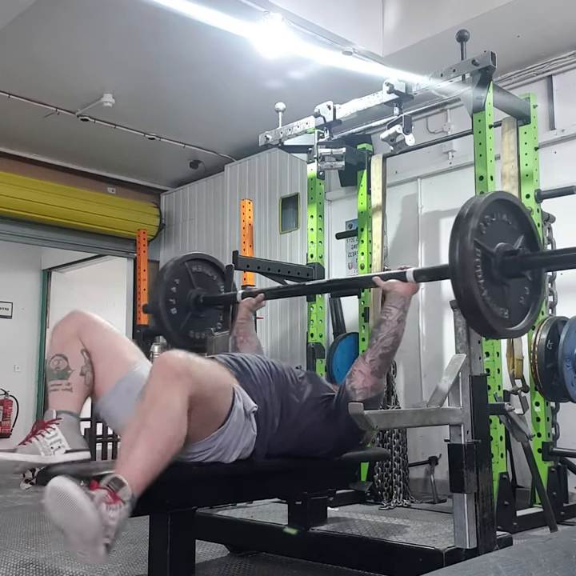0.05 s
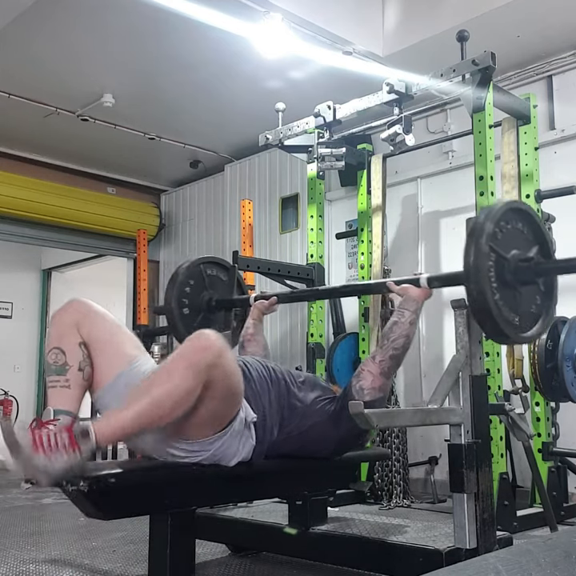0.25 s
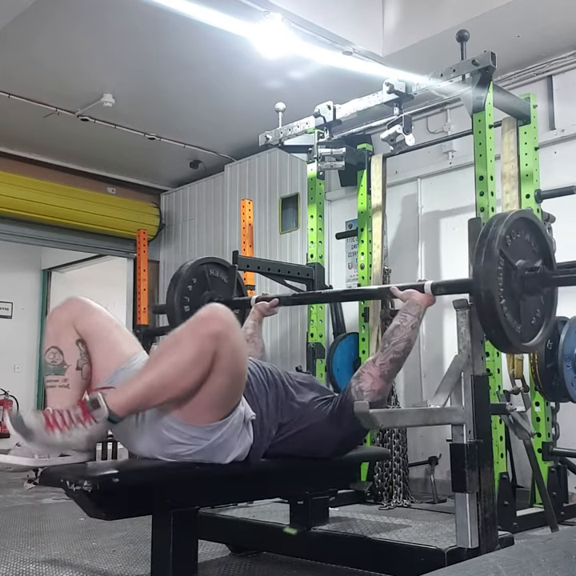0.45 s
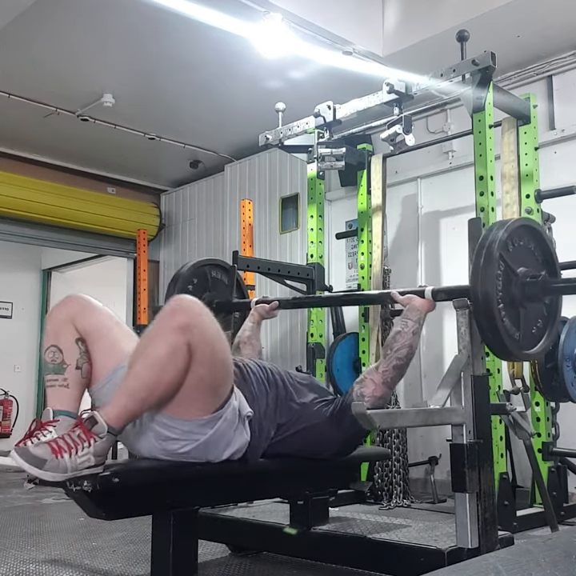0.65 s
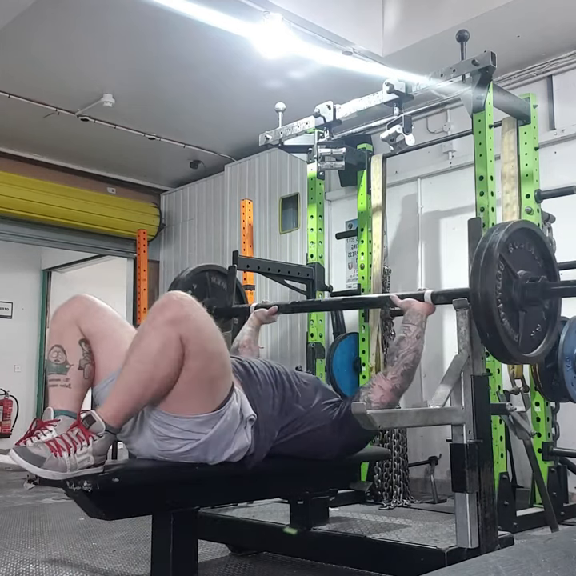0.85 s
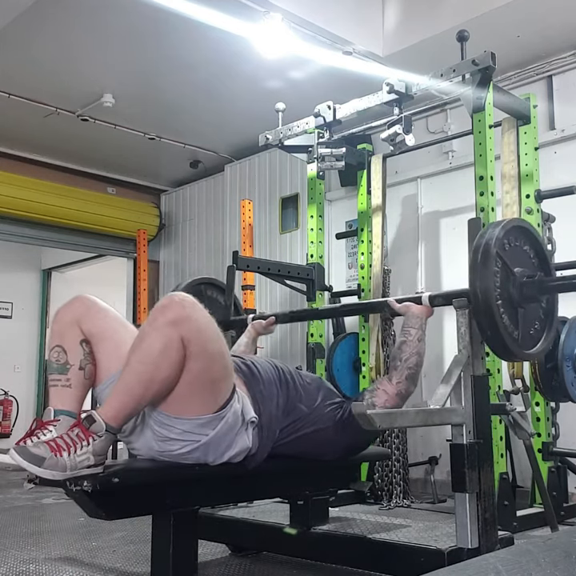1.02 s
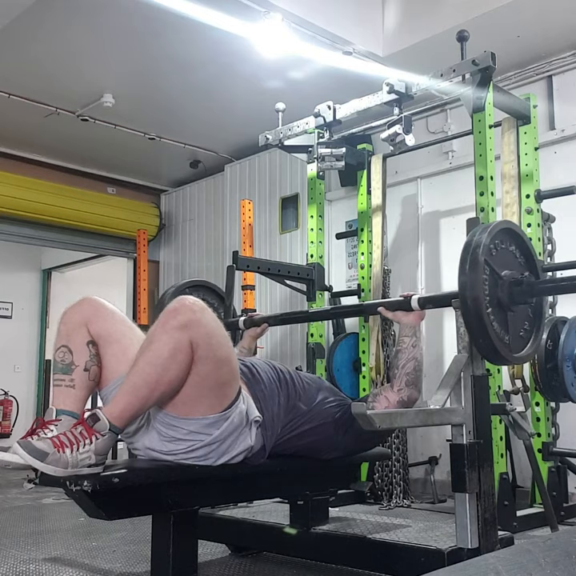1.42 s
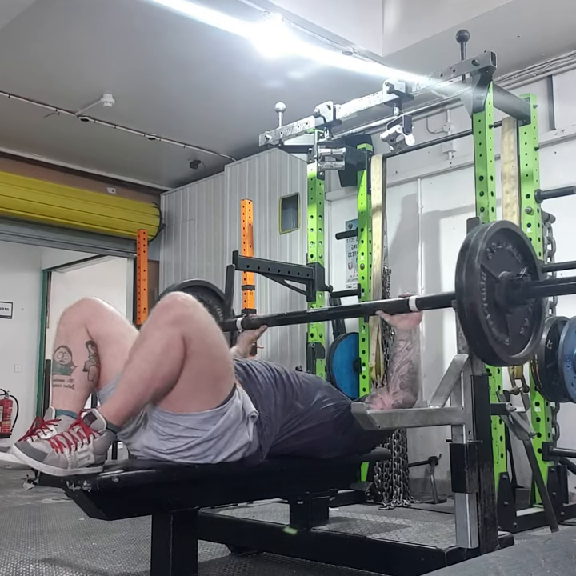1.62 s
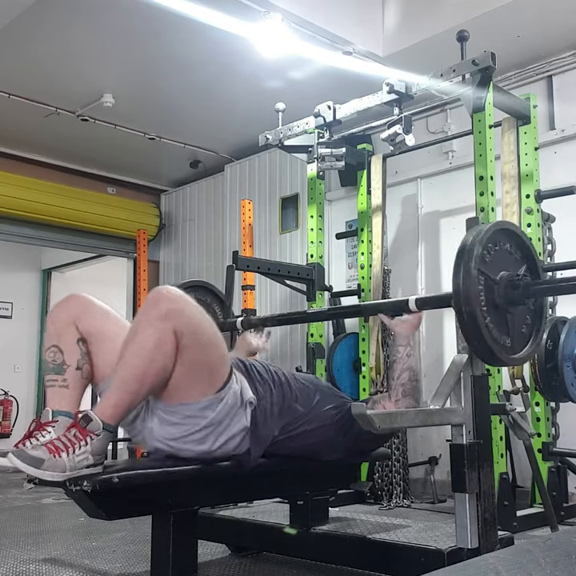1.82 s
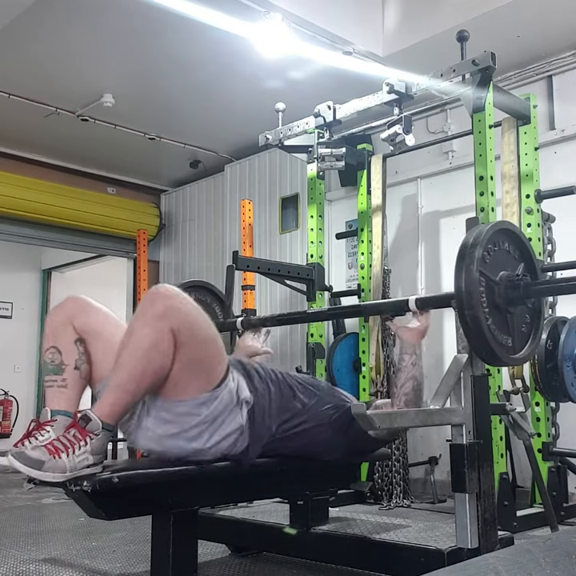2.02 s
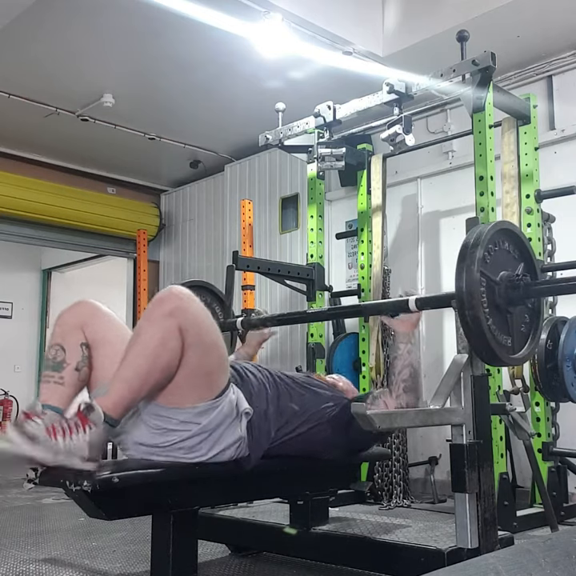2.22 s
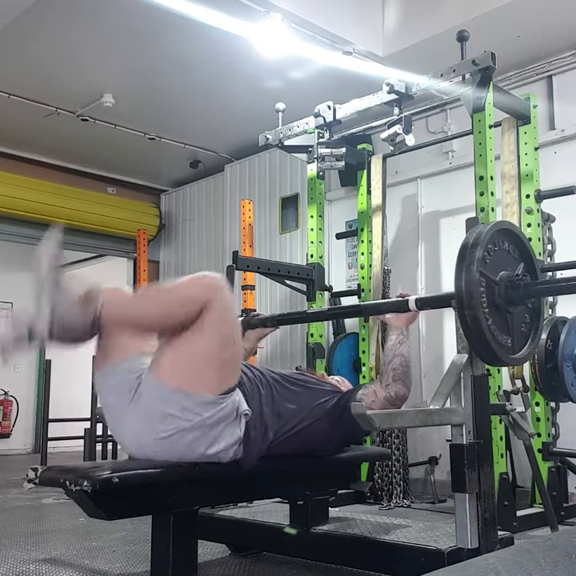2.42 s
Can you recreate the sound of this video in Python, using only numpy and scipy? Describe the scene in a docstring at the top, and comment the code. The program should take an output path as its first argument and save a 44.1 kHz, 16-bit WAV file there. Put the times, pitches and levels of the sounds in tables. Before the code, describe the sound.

A loaded barbell bangs into a steel rack: one end clashes brightly, then the other crashes down with a deeper, booming clang. The weight plates rattle and clink as it settles, echoing in a hard-walled gym.

```python
"""A loaded barbell is slammed into a steel rack in a hard-walled gym. The near end clashes brightly on
its upright, then the far end crashes down with a deeper clang. Each blow rings the steel, knocks the
frame and makes the heavy bar boom. The weight plates rattle on the bar as it settles, a loose one
clinks, and every blow hangs in the hall. Fading noise makes the wash of countless vibrations;
fading sine waves make the few clear tones that stand out of it."""
import sys
import numpy as np
from scipy import signal
from scipy.fft import rfft, irfft, next_fast_len
from scipy.io import wavfile
from scipy.ndimage import map_coordinates

SR = 44100
rng = np.random.default_rng(int(sys.argv[2]) if len(sys.argv) > 2 else 0)


def store_wav(level_fs):
    """Save 16-bit WAV to argv[1]."""
    pcm = np.round(np.clip(np.atleast_2d(level_fs), -1, 1) * 32767)
    wavfile.write(sys.argv[1], SR, pcm.T.astype(np.int16))


N = 112454
AGE = np.arange(N) / SR  # seconds since a sound began
LONGEST_RING_S = 1.5  # upper limit on a tone's "ring", the time it takes to fade by 60 dB


def amp(db):
    """Turn decibels into a gain to multiply by."""
    return 10 ** (np.asarray(db) / 20)


def along(points, hz):
    """Read a curve of (frequency, value) points, with octaves evenly spaced."""
    f, v = np.transpose(points)
    return np.interp(np.log(hz + 1), np.log(f + 1), v)


def add(track, s, sound):
    """Mix a sound into the track, starting at s seconds."""
    start = round(s * SR)
    part = sound[:, max(-start, 0):N - max(start, 0)]
    track[:, max(start, 0):][:, :part.shape[1]] += part


def rise(seconds):
    """A smooth climb from silence to full level."""
    return 1 - np.exp(-AGE / seconds)


def tilt_db(hz, brightness):
    """Brighten or darken a sound around 2000 Hz; brightness is in dB per octave."""
    return brightness * np.log2(np.maximum(hz, 250) / 2000)


def spread(mid, side, hz):
    """Make left and right: the bass is centred, the treble comes from all around."""
    # how wide the sound is: f/Hz, side over mid/dB
    widths = [(60, -26), (180, -15.5), (350, -14), (700, -8), (1200, 2), (2500, -0.5), (6000, 0),
              (12000, 0)]
    # which way it leans: f/Hz, left over right/dB
    leans = [(60, -0.5), (180, 3), (700, 1), (1400, 1.6), (2800, 0), (5500, -1.4), (11000, 0)]
    width = amp(along(widths, hz))
    lean = amp(along(leans, hz) / 2)
    left = (mid + width * side) * lean
    right = (mid - width * side) / lean
    return np.array([left, right]) / np.sqrt(1 + width ** 2)


def wash(spectrum, brightness=0, ripple=None):
    """Stereo noise shaped by a spectrum, then scaled to an average power of 1."""
    size = next_fast_len(N)
    hz = np.fft.rfftfreq(size, 1 / SR)
    db = along(spectrum, hz) + tilt_db(hz, brightness) + (0 if ripple is None else along(ripple, hz))
    mid, side = np.exp(2j * np.pi * rng.random((2, len(hz)))) * amp(db)
    noise = irfft(spread(mid, side, hz), size)[:, :N]
    return noise / np.sqrt(np.mean(noise ** 2) + 1e-20)


def resonances(spacing_hz=42, depth_db=4.3, from_hz=1200):
    """The countless small peaks and dips in the treble of one steel part, as (Hz, dB) points."""
    hz = np.arange(0, SR / 2, spacing_hz)
    chance = rng.uniform(-1, 1, len(hz))
    return np.transpose([hz, depth_db * chance * hz ** 2 / (hz ** 2 + from_hz ** 2)])


def hall_decay(sound, treble_hz=8000, treble_rise_s=0.0081):
    """Each frequency dies away at the hall's own speed; the highest builds up as the steel chatters."""
    # how long the hall echoes: f/Hz, time to fade by 60 dB/s
    echo_times = [(100, 1.0), (250, 1.22), (700, 1.34), (1700, 1.41), (3500, 1.233), (6500, 0.97),
                  (9000, 0.77), (15000, .5)]
    hz, t, bands = signal.stft(sound, SR, nperseg=256)
    hz = hz[:, None]
    treble = hz ** 4 / (hz ** 4 + treble_hz ** 4)
    fade = amp(-60 * t / along(echo_times, hz))
    build_up = 1 - treble * np.exp(-t / treble_rise_s)
    return signal.istft(bands * fade * build_up, SR, nperseg=256)[1][:, :N]


def tones(modes, brightness=0, attack_s=.005, wander_hz=20, blur_radians=.95):
    """The clear, fading tones of struck steel, each blurred by its reflections."""
    out, power = np.zeros((2, N)), 0
    drift_times = np.linspace(0, AGE[-1], 512)
    for hz, db, ring_s in modes:
        ring_s = min(ring_s, LONGEST_RING_S)
        t = AGE[:int(ring_s * SR)]
        gain = amp(db + tilt_db(hz, brightness))
        drift = map_coordinates(rng.standard_normal(len(drift_times)), [drift_times * wander_hz])
        phase = 2 * np.pi * (hz * t + rng.random()) + blur_radians * np.interp(t, drift_times, drift)
        phase = phase.astype(np.float32)
        tone = spread(np.sin(phase), rng.choice([-1, 1]) * np.cos(phase), hz)
        out[:, :len(t)] += tone * gain * amp(-60 * t / ring_s)
        power += gain ** 2 / 2
    return out / np.sqrt(power) * rise(attack_s)


def impacts(blows, steel, modes, tones_db, clash_db=-4, clash_fade_s=0.42, boom_fade_s=.75):
    """Each blow rings the steel, knocks the frame and makes the loaded bar boom."""
    # the knock of the rack frame: f/Hz, relative level/dB
    frame_spectrum = [(90, -22.5), (140, -12.5), (180, -1), (270, 1.5), (340, -7.5), (600, -21),
                      (1500, -59)]
    # the boom of the loaded bar: f/Hz, relative level/dB
    bar_spectrum = [(20, -45), (30, -30), (40, -23.5), (52, -12.5), (66, -3.5), (82, -5), (115, -12.5),
                    (200, -29.5), (500, -66)]
    out = np.zeros((2, N))
    # the first clash stands above the hall's echo
    clash = rise(seconds=0.0046) * (1 + amp(clash_db - 60 * AGE / clash_fade_s)) / (1 + amp(clash_db))
    boom_shape = rise(seconds=0.012) * amp(-60 * AGE / boom_fade_s)
    ripple = resonances()
    for s, db, brightness, knock_db, boom_db in blows:
        steel_wash = amp(db) * wash(steel, brightness, ripple)
        knock = amp(knock_db) * rise(seconds=.004) * wash(frame_spectrum)
        clear_tones = amp(db + tones_db) * tones(modes, brightness)
        boom = amp(boom_db) * boom_shape * wash(bar_spectrum)
        add(out, s, clash * hall_decay(steel_wash + knock) + clear_tones + boom)
    return out


def gym_air():
    """The quiet air of the gym: a steady, low rumble."""
    # background noise: f/Hz, relative level/dB
    spectrum = [(20, -12.5), (45, -5), (63, 11), (85, -8), (200, -8), (600, -21), (1700, -29.5),
                (4000, -37), (12000, -57)]
    return amp(-69) * wash(spectrum)


def loose_plate_clinks():
    """A loose plate clinks against the steel; one clink is already ringing at the start."""
    # clinks: t/s, level/dB, brightness/(dB per octave), knock/dB, boom/dB
    blows = [(-.06, -40.5, 0.9, -41, -56), (1.42, -43.5, 2.3, -44.5, -53.5), (1.683, -30, 0.14, -43.5, -45),
             (1.856, -43.5, -2.5, -56, -60)]
    # the loose plate's wash: f/Hz, relative level/dB
    steel = [(100, -17.5), (400, -9.5), (900, -7), (1700, -6.5), (2400, -8), (3400, -12.5), (6500, -14),
             (8400, -24), (11500, -18.5), (15500, -23.5)]
    # its clear tones: f/Hz, relative level/dB, ring/s
    modes = [(236, 0.5, 0.51), (264, -9, .7), (2030, -10, .8), (2290, -9, .7)]
    return impacts(blows, steel, modes, tones_db=-10)


def near_end():
    """The near end of the bar strikes its upright with a bright clash."""
    # strikes: t/s, level/dB, brightness/(dB per octave), knock/dB, boom/dB
    blows = [(.2225, -12.5, 0.7, -29, -49.5), (.235, -9.5, 0.5, -25, -42), (.303, -11, 1, -42, -36.5),
             (.345, -28.5, -1, -37, -34.5), (.44, -35.5, -6.5, -40.5, -40.5)]
    # the near end's wash: f/Hz, relative level/dB
    steel = [(59, -37.5), (100, -12.5), (180, -10.5), (264, -5), (355, -12), (420, -5), (700, -6),
             (1000, -4), (1500, -4.5), (2550, -4), (3000, -7.5), (3850, -8), (4400, -3), (4850, -5.5),
             (5300, -2), (6050, -10.5), (6700, -5), (7300, -12.5), (8100, -20), (12000, -15.5),
             (15500, -25.5)]
    # its clear tones: f/Hz, relative level/dB, ring/s (limited to LONGEST_RING_S)
    modes = [(887, 0, 0.35), (950, -8.5, 1.7), (1637, -7.5, 1.3), (2235, -5.5, 1.4), (2350, -9.5, 0.74),
             (2640, -0.5, .9), (4230, -7, 1.6), (4640, -9.5, 2.4), (4689, -8, 0.9), (5285, -2, 0.46),
             (5330, -4, 0.65), (5630, -12, 0.7), (6310, -8.5, 2.1), (6675, -13, .9)]
    return impacts(blows, steel, modes, tones_db=-12.5)


def hooks(attack_s=0.00068):
    """Each end lands in its hook with a short clonk and a bright clash."""
    # landings and rebounds: t/s, clonk/dB, clash/dB
    landings = [(0.2237, -18.5, -16), (.242, -35, -19), (0.306, -28.5, -14.5), (1.02, -18, -36.5)]
    # tones of the hook and its upright: f/Hz, relative level/dB, ring/s
    hook_modes = [(180, -2.5, .35), (213.7, -11, 0.54), (425.3, -4, 0.6), (583, -4.5, .16),
                  (695, 3.5, 0.13), (777, 1.5, .3), (850, -7.5, 0.13)]
    # tones of steel first hitting steel: f/Hz, relative level/dB, ring/s
    clash_modes = [(1370, -0.5, 0.13), (1880, -1, 0.19), (2700, -7.5, 0.095), (3680, -0.5, .1),
                   (3850, -7, 0.058), (5290, 1.5, .2), (5520, -9, .15), (7000, 1, 0.18)]
    out = np.zeros((2, N))
    for s, clonk_db, clash_db in landings:
        clonk = amp(clonk_db) * tones(hook_modes, attack_s=attack_s)
        clash = amp(clash_db) * tones(clash_modes, attack_s=attack_s)
        add(out, s, clonk + clash)
    return out


def plate_rattle():
    """The weight plates bump together on the ends of the bar."""
    # bumps: t/s, level/dB, brightness/(dB per octave), knock/dB, boom/dB
    blows = [(.746, -29.5, -0.6, -37, -43), (.818, -39, 0, -35, -42), (1.232, -33.5, 3, -46.5, -41),
             (1.32, -42, -3.5, -51, -44), (1.494, -27.5, 0.6, -37, -39), (1.517, -29, 0.5, -45, -47),
             (1.58, -41, 0, -44, -41.5), (1.77, -40.5, -0.5, -52.5, -49.5)]
    # the plates' wash: f/Hz, relative level/dB
    steel = [(100, -13), (160, -5.5), (265, -12.5), (430, -10), (650, -6), (1000, -8), (1300, -6.5),
             (2200, -7.5), (3200, -17.5), (5000, -15), (6700, -18), (8400, -30.5), (11500, -30),
             (15500, -38)]
    # their clear tones: f/Hz, relative level/dB, ring/s
    modes = [(175, -7.5, 0.8), (264, 0, 1), (302, -4, .9), (922, 1, 1.1), (963, -1, 1.1), (1077, -2, 0.67),
             (1100, -3.5, 0.99), (1182, -4.5, .9)]
    return impacts(blows, steel, modes, tones_db=-8)


def far_end():
    """The far end of the bar crashes down with a deeper clang."""
    # strikes: t/s, level/dB, brightness/(dB per octave), knock/dB, boom/dB
    blows = [(1.019, -13, -0.5, -27.5, -24.5), (1.057, -12, 1, -37, -31), (1.086, -13.5, 0, -28.5, -32.5),
             (1.145, -15, 1.88, -30.5, -44)]
    # the far end's wash: f/Hz, relative level/dB
    steel = [(59, -40), (100, -19.5), (146, -9.5), (253, -1.5), (477, -10.5), (614, -6), (808, -10),
             (1110, 1), (1370, -4), (2220, -5), (3610, -12.5), (6660, -15), (8580, -26), (11800, -23),
             (15500, -28.5)]
    # its clear tones: f/Hz, relative level/dB, ring/s
    modes = [(281.4, -7.5, 0.39), (631, -4, 0.57), (697, -7.5, 0.83), (1060, -5, 0.52), (1123, -7, .8),
             (1330, -7, 0.67), (1730, -1.5, .95), (2050, -11.5, 1.0), (2080, -7.5, 0.87), (2174, 5, .7),
             (2334, -1.5, 0.99), (2330, -23, .8), (2507, 0, .7), (2910, -5.5, .8)]
    return impacts(blows, steel, modes, tones_db=-10)


def loose_plate_ping(start_s=1.858, level_db=-46):
    """The loose plate touches once more and rings on."""
    # its lingering note: f/Hz, relative level/dB, ring/s
    modes = [(1590, -6, 1.2), (1634, 0, 1.4), (1684, -2, 1.3), (1745, -7, 1.2)]
    out = np.zeros((2, N))
    add(out, start_s, amp(level_db) * tones(modes))
    return out


def scene():
    """Both ends of the bar, the settling plates and the quiet air of the gym."""
    bar = near_end() + far_end()
    plates = plate_rattle() + loose_plate_clinks()
    return bar + plates + hooks() + loose_plate_ping() + gym_air()


def record(dry, hardness=6, top_hz=15800):
    """The microphone rounds off the highest peaks and keeps nothing above top_hz."""
    rounded = dry / (1 + np.abs(dry) ** hardness) ** (1 / hardness)
    size = next_fast_len(N + SR // 2)
    in_range = np.fft.rfftfreq(size, 1 / SR) < top_hz
    return irfft(rfft(rounded, size) * in_range, size)[:, :N]


dry = scene()
out = record(dry)
store_wav(out)
```